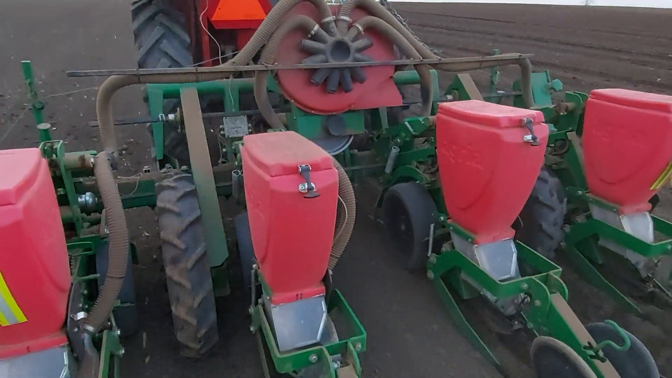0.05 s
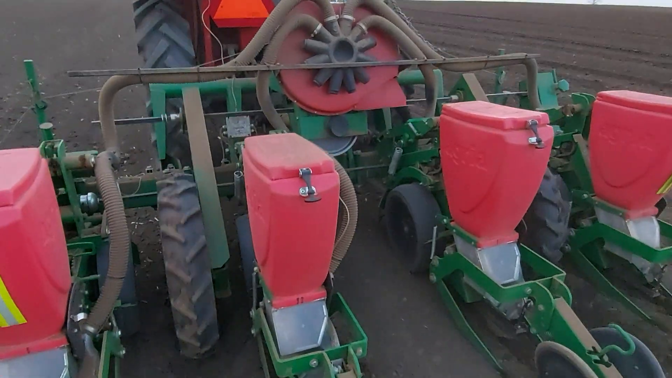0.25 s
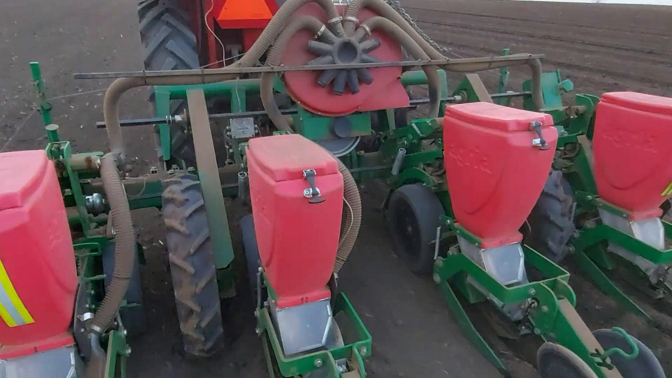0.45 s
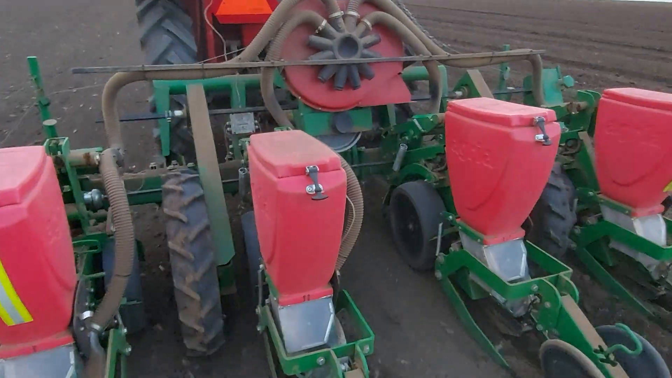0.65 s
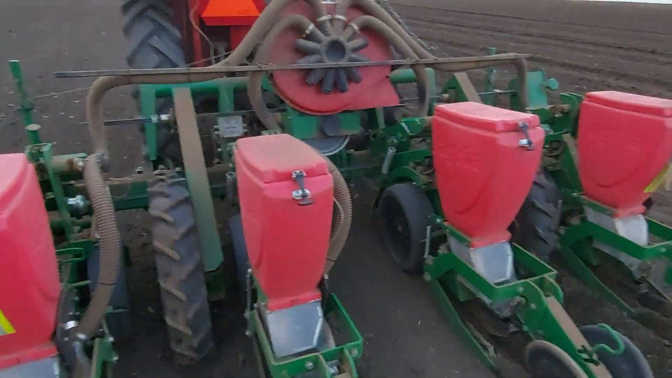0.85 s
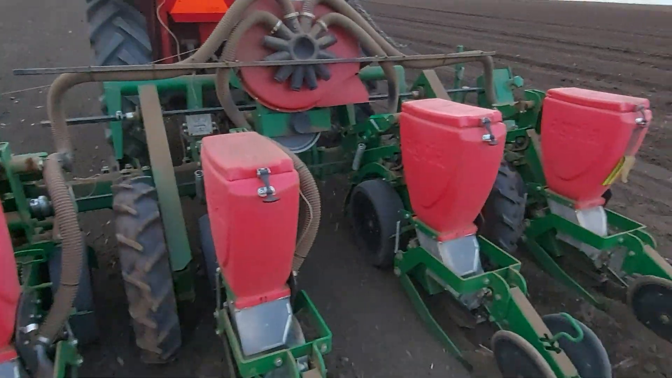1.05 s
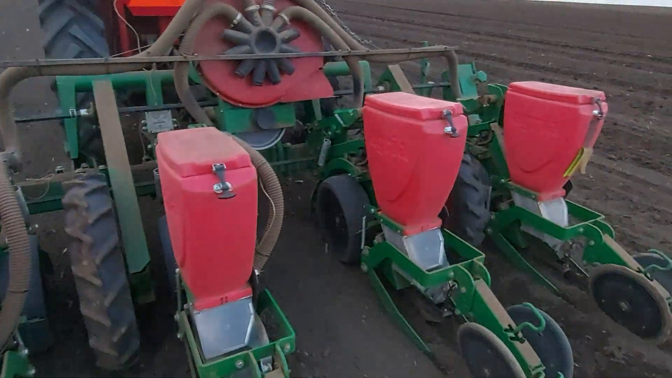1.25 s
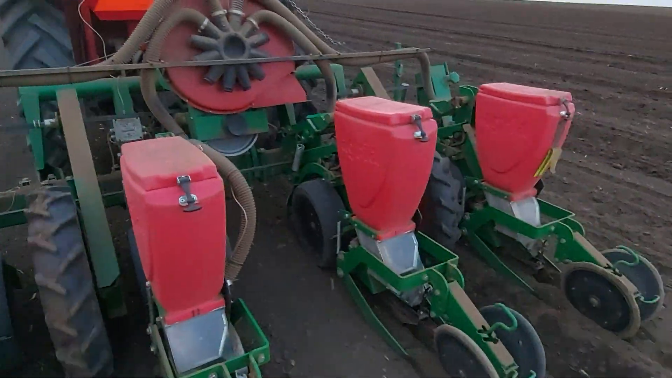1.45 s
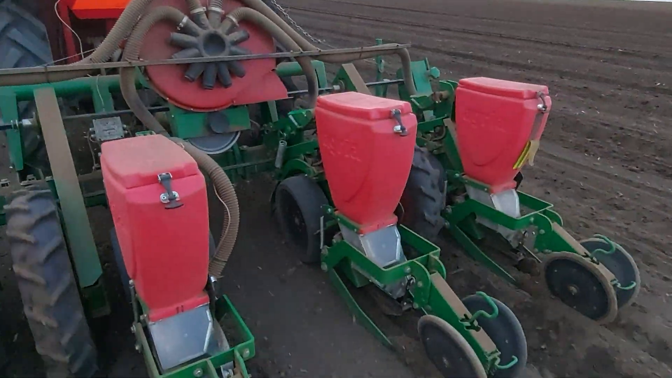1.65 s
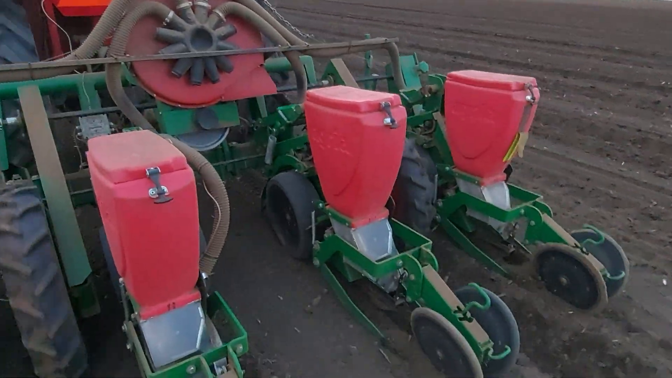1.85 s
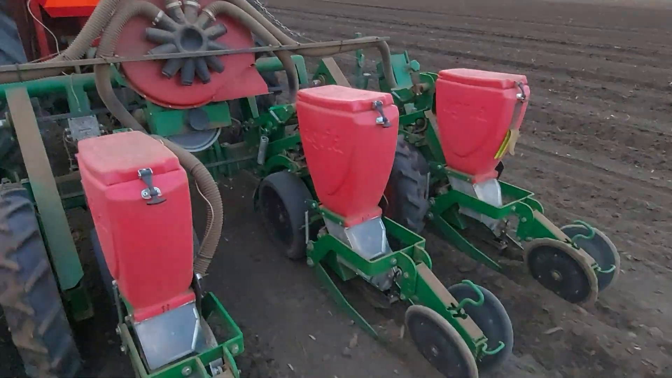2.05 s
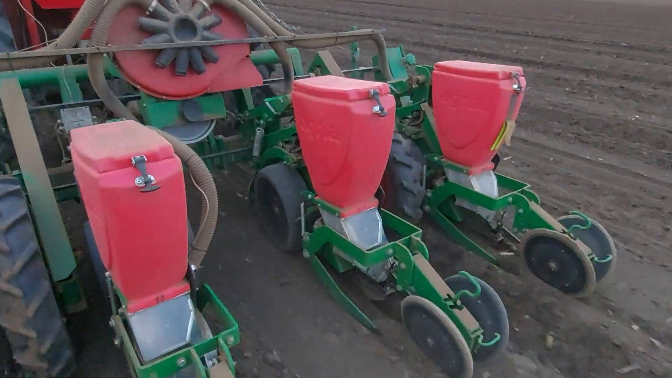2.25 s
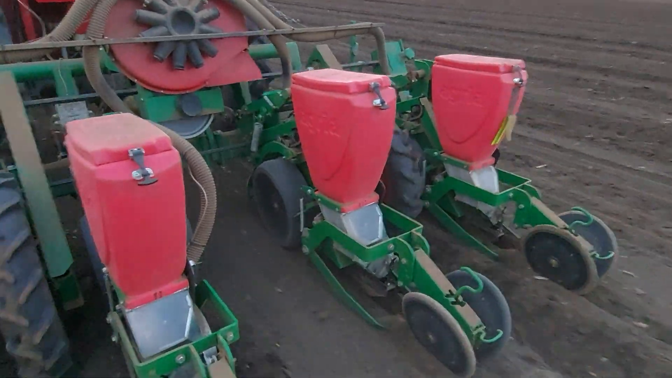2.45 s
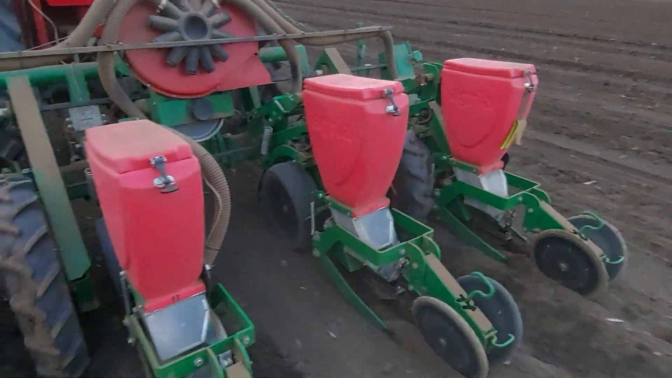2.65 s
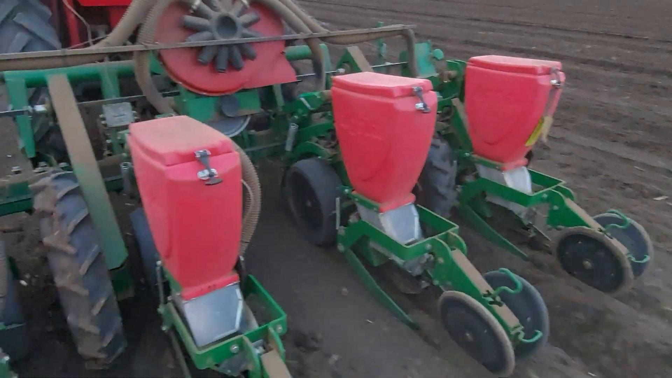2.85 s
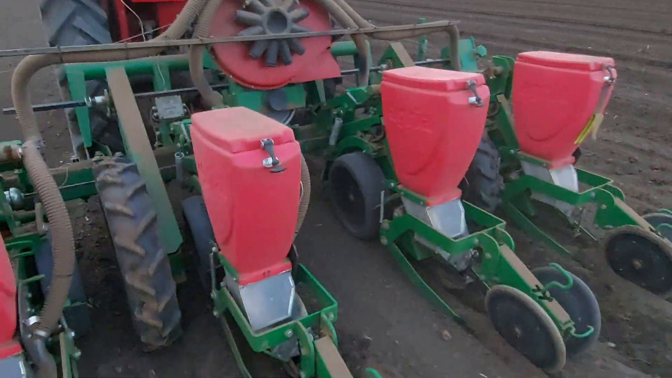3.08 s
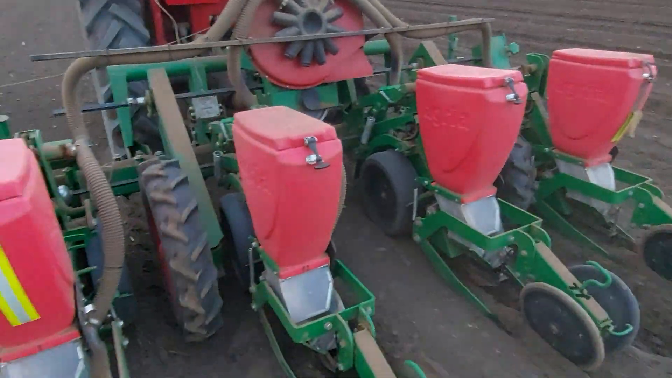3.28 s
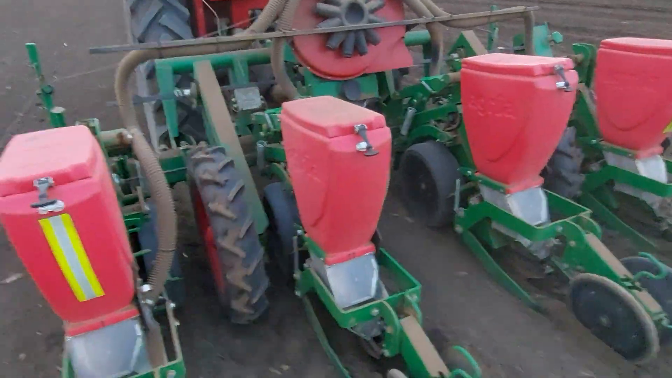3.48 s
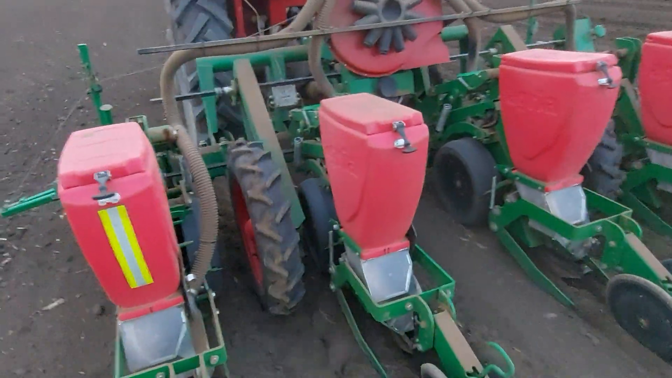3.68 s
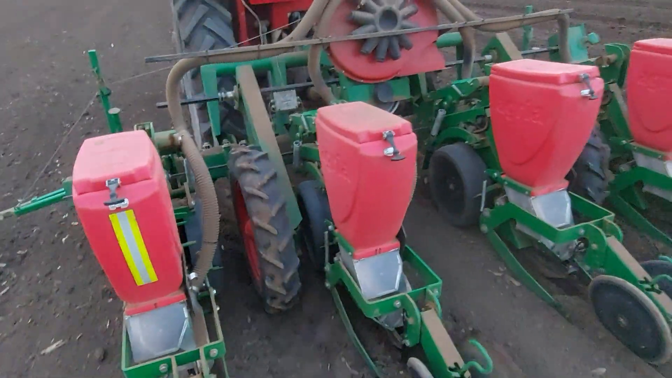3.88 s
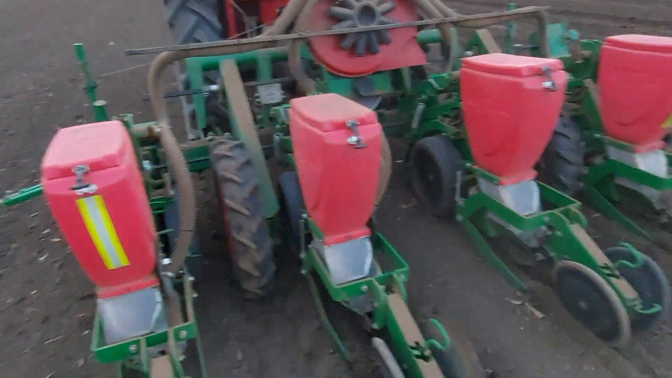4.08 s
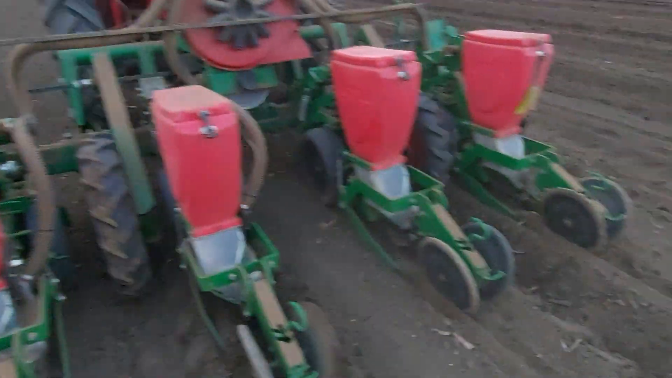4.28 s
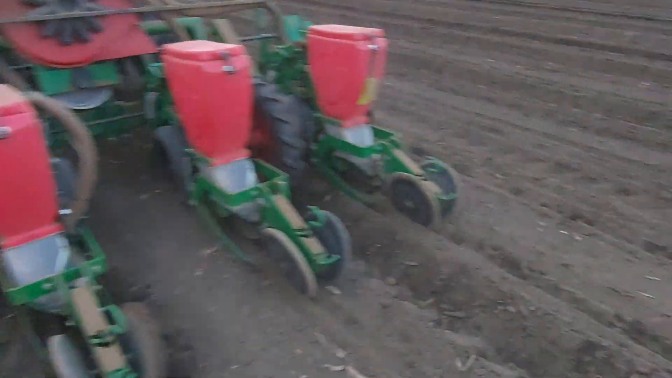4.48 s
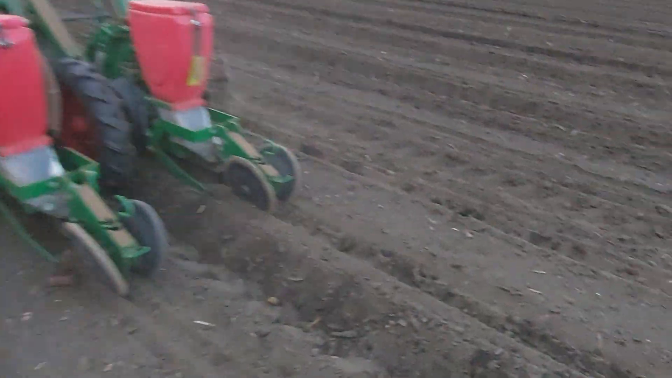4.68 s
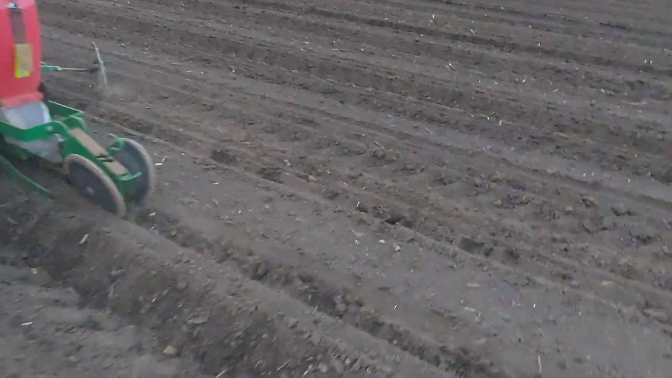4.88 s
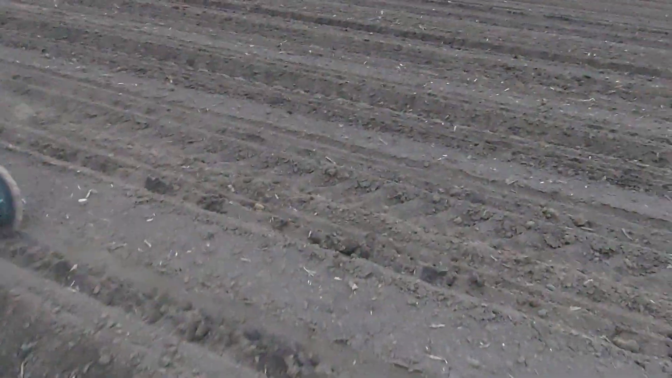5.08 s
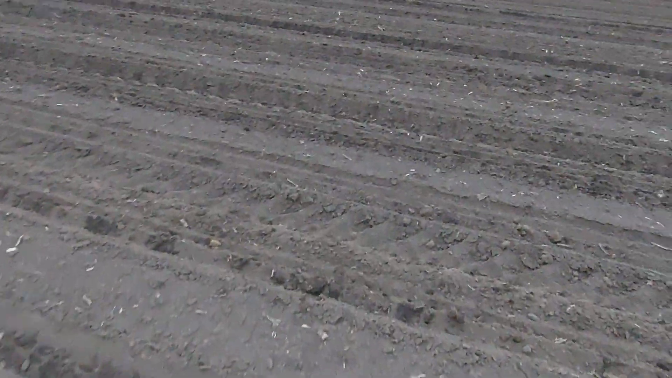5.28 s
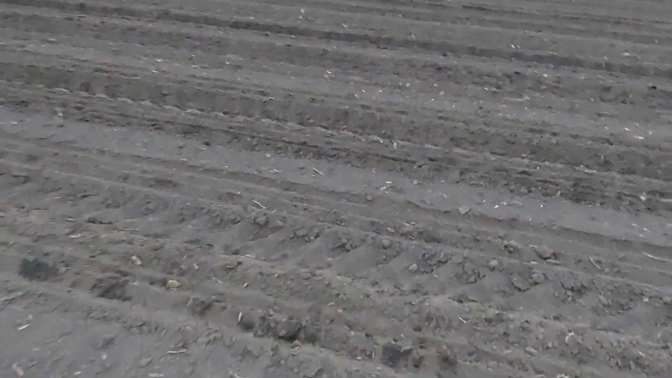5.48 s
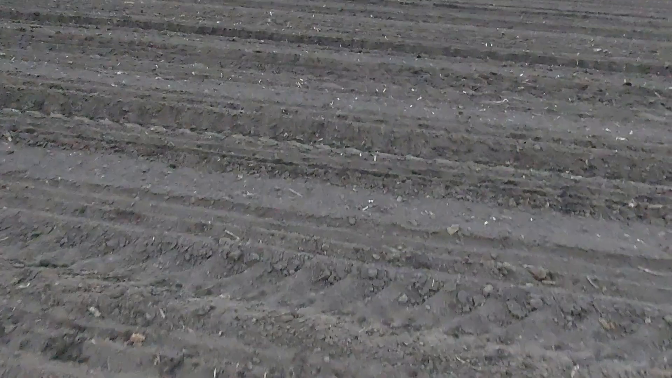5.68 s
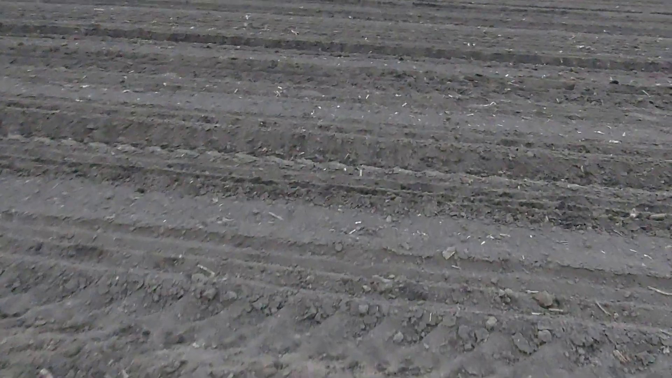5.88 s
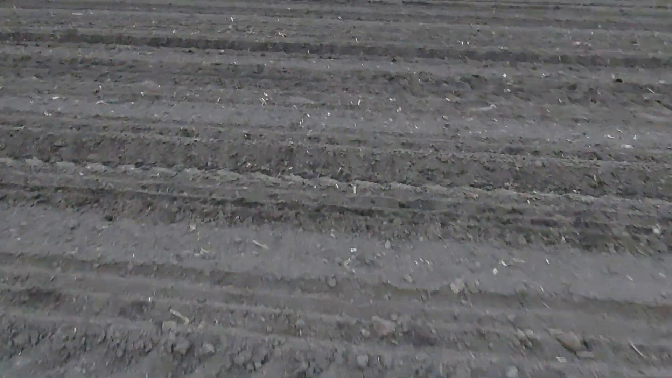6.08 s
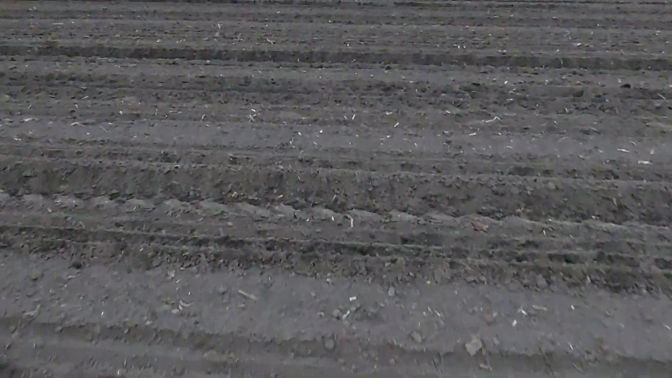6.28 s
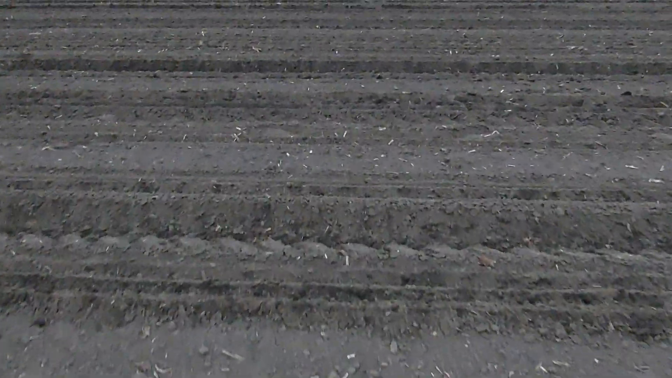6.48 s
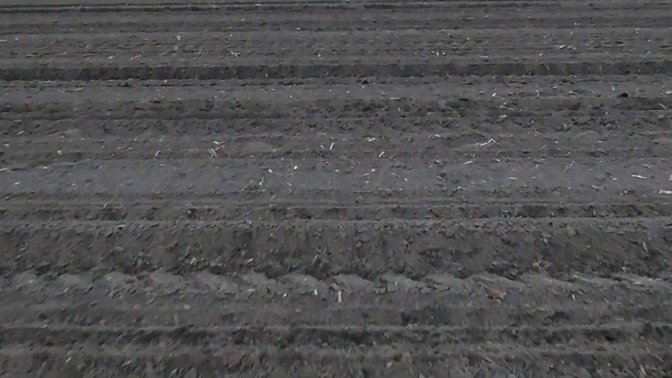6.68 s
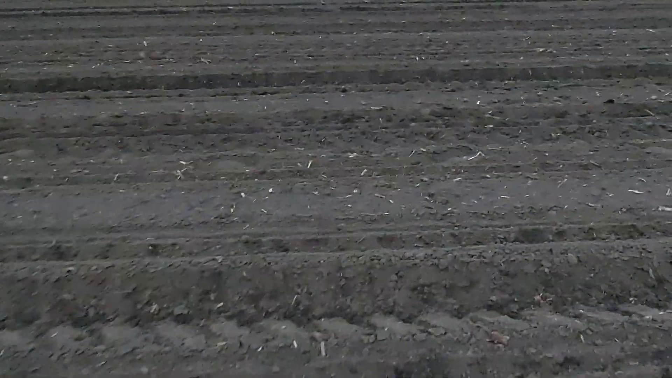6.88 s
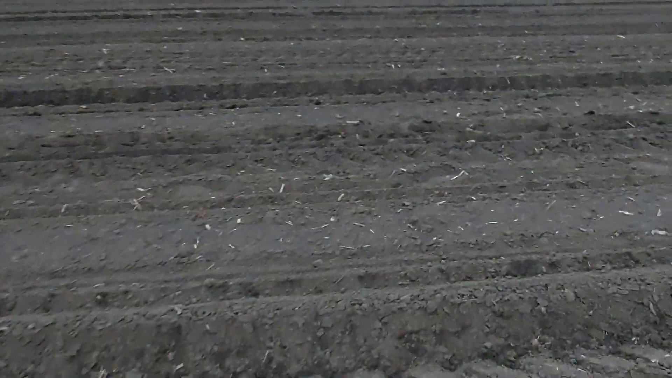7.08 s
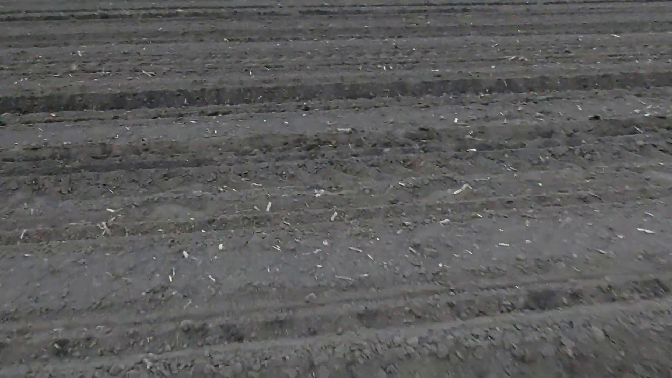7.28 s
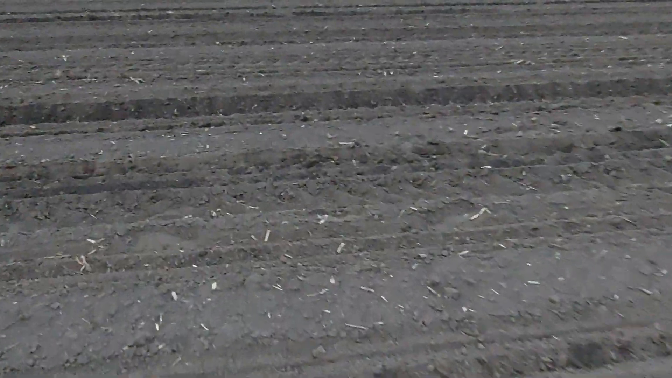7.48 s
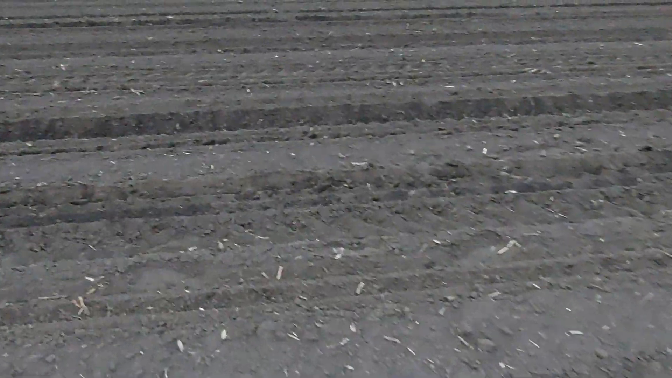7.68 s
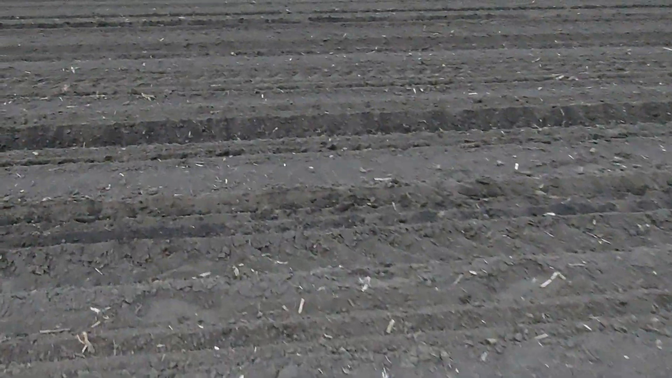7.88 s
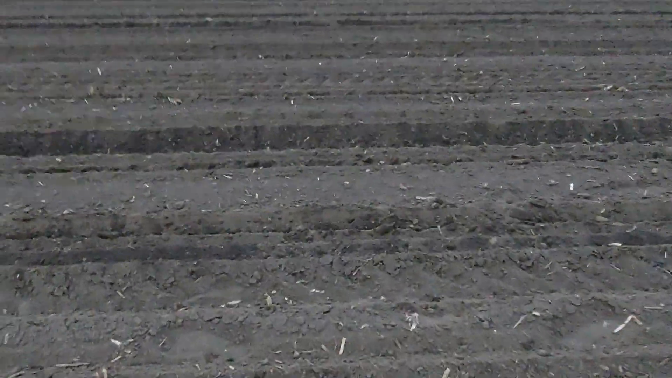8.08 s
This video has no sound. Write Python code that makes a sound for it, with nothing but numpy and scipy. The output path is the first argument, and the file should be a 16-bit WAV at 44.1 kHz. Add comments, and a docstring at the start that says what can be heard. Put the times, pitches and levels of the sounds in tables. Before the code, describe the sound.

A tractor at constant speed pulls a pneumatic planter. Its fan holds one buzzing, siren-like pitch, with rushing air, sizzling leaks, thin gear tones and a lumpy diesel rumble beneath. A handheld stereo microphone follows near, catches a soft wind buffet, then turns toward bare soil, so the sound becomes quieter, duller and hollow without stopping.

```python
"""A fan whines at its blade rate over a roar of air and a hiss of suction, while an engine throbs below.
The four-cylinder tractor draws a pneumatic planter over a field; its shaft spins the planter's vacuum fan.
Whine, engine and gears are sums of sines locked to one shaft speed; the air sounds are filtered noise.
Two spaced microphone ports follow close behind, then turn aside: the fan grows quieter and duller."""
import sys
import numpy as np
from scipy import signal
from scipy.fft import rfft, irfft, next_fast_len
from scipy.io import wavfile
from scipy.ndimage import uniform_filter1d

SR = 44100
rng = np.random.default_rng(int(sys.argv[2]) if len(sys.argv) > 2 else 0)


def dump(signal):
    """Clip the signal to [-1, 1] and save it as 16-bit WAV at the path in sys.argv[1]."""
    limited = np.clip(np.atleast_2d(signal).T, -1, 1)
    pcm = np.round(limited * 32767).astype(np.int16)
    wavfile.write(sys.argv[1], SR, pcm)


N = 358974

TIME = np.arange(N) / SR
FINE_TIME = np.arange(4 * N) / (4 * SR)
SIZE = next_fast_len(N, True)
HZ = np.maximum(np.arange(SIZE // 2 + 1) * SR / SIZE, 1)

# Mean blade passing rate, sagging a little as the load grows: (time [s], rate [Hz])
BLADE_RATE = [(0, 624.4), (3, 624.1), (4.4, 623.2), (5, 621.5), (5.5, 618), (6.2, 619.2), (6.6, 617.6),
              (8.14, 617.8)]
BLADES_PER_REV = 18
BELT_LAPS_PER_S = 14.4   # at the opening blade rate; follows the shaft speed
# Blade tone before panning: (time [s], level [dB])
WHINE_LEVEL = [(0, -11.5), (1.1, -12), (2.9, -13.7), (3.4, -13), (4.75, -13), (4.92, -18), (6.2, -22),
               (7.2, -18.5), (8.14, -20.5)]
# Bearing of the machine, as the lag of the left port behind the right: (time [s], lag [ms])
BEARING = [(0, 0.05), (.6, 0.064), (1.5, -0.12), (2.4, -0.15), (3, 0.007), (3.9, 0.15), (4.2, 0.024),
           (4.6, -0.29), (5.1, -.49), (6.5, -0.49), (7.25, -0.39), (8.14, -0.48)]
# Swell and fade of the air noises with the walker's distance: (time [s], level [dB])
NEARNESS = [(0, -0.35), (2.2, 1.7), (4, -0.5), (4.9, 0.95), (5.6, -1.1), (6.5, 1), (7.5, -0.25),
            (8.14, -0.8)]

# Relative spectrum of fan casing and hoses: (frequency [Hz], facing [dB], turned aside [dB])
ROAR_COLOUR = [(224, -16, -14), (299, -5.5, -3.5), (375, -10, -9), (432, 0.5, -0.5), (483, -4, -5.5),
               (565, 3, 2.5), (728, -9, -1), (704, -11, 0.5), (842, -6, -2), (890, -1.5, -8.5),
               (927, -10, -10), (1085, -1.5, -10), (1217, -6.5, -8), (1300, -11, -10.5)]
# Relative spectra of hoses and of their leaks:
# (frequency [Hz], facing left [dB], facing right [dB], aside left [dB], aside right [dB])
HISS_COLOUR = [(1484, 7.5, 4.5, -3, -10), (1650, 1.5, 2, -2, -3), (1910, 4, -6, -1, -0.5),
               (2120, 6, 4.5, 2, 2), (2380, 2, 0, 0, 3), (2900.0, 1.5, -2, -5, 0),
               (3500.0, 1, -3.5, 2.5, 4), (4300, 0.5, 0, -5.5, 4), (4820, 2, -0.5, 0.5, -14),
               (5600, -1.5, 4.5, -6, -1), (6170, 1.5, 2, -1, -2.5), (7200, -2.5, -2.5, -4, -6),
               (8150, -9, 0.5, -15, -1.5), (9190, -13, -5, -12, -10)]
SIZZLE_COLOUR = [(9500, 1.5, -14, -2, -28), (10300.0, 0, -1, -2, 3), (11400, -4.5, 8.5, 0, 1),
                 (12300.0, 1.5, 5, 1, -1), (14000.0, -0.5, 6.5, -2.5, 5), (15800, -8, 7.5, -4, -2)]
# Power share of air noise straight from the fan: (frequency [Hz], facing [0-1], turned aside [0-1])
DIRECT = [(200, 0.86, 1), (590, 0.99, 0.94), (1070, 0.94, 0.93), (1500, 0.4, 1), (2300, 0.52, 0.77),
          (4000, 0.05, 0.49), (7000, 0.07, 0.58), (15000, 0, 0)]
# Base levels of the air noises, first row facing, second in the shade: (left [dB], right [dB])
ROAR_LEVEL = [(-19.5, -20), (-25, -25)]
HISS_LEVEL = [(-27.5, -24.5), (-33.3, -25.5)]
SIZZLE_LEVEL = [(-33.5, -31), (-38, -47)]

# Even engine orders against the firing tone: (multiple of crank rate [1], facing [dB], aside [dB])
EVEN_ORDERS = [(2, 1.5, -0.5), (4, -35, -16), (6, -20, -21), (8, -16.5, -20)]
# Odd and half orders against the lope: (multiple of crank rate [1], facing [dB], aside [dB])
ODD_ORDERS = [(3, -0.5, 1.5), (3.5, -11, -20), (4.5, -13, -26), (5, -1.5, -7.5), (7, -20, -20),
              (9, -21, -22.5)]
# Relative spectrum of the exhaust rumble: (frequency [Hz], level [dB])
RUMBLE_COLOUR = [(20, -31), (35, -21), (50, -15), (65, -1), (88, -9), (125, 0.5), (165, -2.5), (195, -10.5),
                 (230, -10)]
# Engine parts before the scene's common gain: (facing [dB], in the shade [dB])
FIRING_DB, LOPE_DB, RUMBLE_DB = (-27.5, -24.5), (-31.5, -32), (-34.5, -37)
# Gears and bearings before separate lifts for facing and aside:
# (multiple of crank rate [1], facing [dB], aside [dB])
GEARS = [(11.33, -38, -41), (15.58, -35, -40), (22.44, -37, -41), (25.04, -41, -57), (28.02, -42, -49),
         (39.25, -50, -51), (43.98, -56, -52), (44.85, -57, -53), (45.73, -60, -53), (49.1, -52, -63),
         (52.77, -49, -59), (53.98, -53, -53), (56.1, -53, -59), (61.69, -46, -51), (63.33, -55, -51),
         (67.27, -54, -50), (72.12, -50, -52), (72.85, -55, -50), (75.17, -59, -54), (89.73, -55, -52),
         (106.54, -63, -52), (107.33, -56, -53), (117.92, -52, -51), (121.31, -59, -50), (135.75, -54, -62),
         (151.31, -52, -55)]

# Narrow beams that the ports pass through: (centre [s], half width [s], peak [dB])
HOWL_BEAM = (2.3, 0.63, -31)   # the fan's casing
BOOM_BEAM = (5.12, 0.39, -30)   # the gap between the hoppers
LEAK_BEAM = (4.58, 0.18, 3.3)   # a leak's lift of the hiss at the right port
# Puff of wind: (centre [s], half width [s], peak [dB])
PUFF = (2.93, 0.1, -24)
# Relative spectrum of the puff: (frequency [Hz], level [dB])
PUFF_COLOUR = [(40, -3), (70, 0), (170, -4)]

# The ports swing aside quickly, then sink slowly into the shade of the body that carries them
TURN_S, TURN_LENGTH_S = 4.5, 0.65   # middle and duration
SHADE_S, SHADE_SETTLE_S = 4.75, 0.99   # onset and time constant
# The turn opens an inverted second path to the right port; its detour shortens and it fades
DETOUR_START_MS, DETOUR_END_MS, DETOUR_SETTLE_S = 2.08, 0.078, 1.84
DETOUR_STRENGTH, DETOUR_FADE_S = .72, 5.0
# Hiss also bends round that body to the right port
BEND_MS, BEND_PER_LAG = 0.284, 0.28   # delay at zero lag; added ms per ms of lag
BEND_STRENGTH, BEND_TURN_STRENGTH = 0.2, 0.25   # before the turn; added by it; shade removes both
CUTOFF_HZ = 15800


def from_db(db):
    """Level is logarithmic: decibels to amplitude gain."""
    return np.exp(np.asarray(db) * (np.log(10) / 20))


def rms_one(x):
    """Equal mean power: each channel is scaled to rms 1."""
    return x / np.sqrt(np.mean(x ** 2, axis=-1, keepdims=True) + 1e-20)


def in_time(rows):
    """Linear interpolation of a table's columns at every sample."""
    s, *columns = np.transpose(rows)
    return np.array([np.interp(TIME, s, c) for c in columns])


def in_hz(rows):
    """Interpolation of a table's columns along logarithmic frequency."""
    hz, *columns = np.transpose(rows)
    return np.array([np.interp(np.log(HZ), np.log(hz), c) for c in columns])


def colour(rows):
    """Spectral shaping: gains of unit power, with steep skirts beyond the table's ends."""
    low_skirt = 1 + (rows[0][0] / HZ) ** 24
    high_skirt = 1 + (HZ / rows[-1][0]) ** 40
    return rms_one(from_db(in_hz(rows)) / np.sqrt(low_skirt * high_skirt))


def white(channels):
    """Equal power at all frequencies: spectra of unrelated white noises."""
    return rfft(rng.standard_normal((channels, SIZE)))


def wave(spectrum):
    """Fourier synthesis: a spectrum becomes a signal."""
    return irfft(spectrum, SIZE)[..., :N]


def drift(rate):
    """Low-passed noise: random wander of rms 1, up to about `rate` Hz."""
    count = N // 32 + 2   # coarse grid, interpolated below
    hz = np.arange(count // 2 + 1) * SR / N
    spectrum = rfft(rng.standard_normal(count)) / (1 + (hz / rate) ** 2)
    slow = irfft(spectrum, count)
    return np.interp(TIME, np.linspace(0, N / SR, count), rms_one(slow))


def port_delays(lag_ms):
    """Time difference of arrival: half the lag late at the left port, half early at the right [s]."""
    return np.array([lag_ms, -lag_ms]) / 2000


def angle(hz):
    """Phase is the integral of frequency [rad]."""
    return 2 * np.pi * np.cumsum(hz) / SR


def blend(pair, share):
    """Linear transition from the facing value to the shaded one."""
    facing, shaded = np.array(pair)[..., None]
    return facing + (shaded - facing) * share


def settle(start_s, settle_s):
    """Exponential relaxation: 1 until the start, then dying away."""
    return np.exp(-np.maximum(TIME - start_s, 0) / settle_s)


def passing(beam):
    """Gaussian directivity: a bell from 0 to 1 and back as the ports cross a beam."""
    return np.exp(-.5 * ((TIME - beam[0]) / beam[1]) ** 2)


def whine(blade_hz, lag_ms, turned, flutter=0.092, flutter_rate=20, wobble=.05, belt_depth=0.076,
          lag_share=0.92, pan_db_per_ms=10, aside_pan_db=1.5, octave_db=-19.5, octave_aside_db=-23):
    """Blade-passing tone: blades chop the intake air; eddies and drive-belt laps modulate it."""
    level_db, = in_time(WHINE_LEVEL)
    # the balance follows the bearing until the ports turn
    pan_db = (pan_db_per_ms * lag_ms * (1 - turned) + aside_pan_db * turned) * [[.5], [-.5]]
    lag_phase = 2 * np.pi * blade_hz * port_delays(lag_share * lag_ms)
    phase = angle(blade_hz) + wobble * drift(13) - lag_phase

    belt_hz = BELT_LAPS_PER_S * blade_hz / blade_hz[0]
    belt = belt_depth * np.sin(angle(belt_hz) + .5 * drift(1))
    swell = 1 + belt + flutter * drift(flutter_rate)
    tone = from_db(level_db + pan_db) * swell * np.sin(phase)

    octave_level_db = level_db + 2 * pan_db + blend((octave_db, octave_aside_db), turned)
    octave = from_db(octave_level_db) * (1 + 0.28 * drift(11)) * np.sin(2 * phase)
    return np.sqrt(2) * (tone + octave)


def whirr(crank, repeating=0.11):
    """Cyclic noise: fourfold oversampled, with a power share repeating every two crank turns."""
    fresh = signal.resample_poly(rng.standard_normal(N), 4, 1)
    cycle = signal.resample_poly(rng.standard_normal(int(2 * SR / crank.mean())), 16, 1)
    place = np.interp(FINE_TIME, TIME, angle(crank) / (4 * np.pi)) % 1
    repeated = cycle[(place * len(cycle)).astype(int)]
    share = np.clip(repeating, 0, 1)
    return np.sqrt(1 - share) * fresh + np.sqrt(share) * repeated


def panel_echoes(source, shortest=0.00122, longest=.006, sway=.00007, count=4):
    """Comb filtering by reflections from hoppers and frame; path times [s] sway, shifting the ripples."""
    def echo(path):
        return np.interp(TIME - path - sway * drift(0.42), FINE_TIME, source)
    paths = rng.uniform(shortest, longest, (2, count))
    return rms_one(np.array([sum(echo(path) for path in port) for port in paths]))


def turbulence(crank, delay, turned, echo_share=0.31):
    """Partial coherence: a direct noise that lags between ports, mixed with a scattered one."""
    source = whirr(crank)
    echo_share = np.clip(echo_share, 0, 1)
    direct = rfft([np.interp(TIME - d, FINE_TIME, source) for d in delay], SIZE)
    echoes = rfft(panel_echoes(source), SIZE)
    scattered = np.sqrt(echo_share) * echoes + np.sqrt(1 - echo_share) * white(channels=2)
    facing, aside = [wave(np.sqrt(share) * direct + np.sqrt(1 - share) * scattered)
                     for share in np.clip(in_hz(DIRECT), 0, 1)]
    return rfft((1 - turned) * facing + turned * aside, SIZE)


def airflow(noise, spectrum, port_db, aside):
    """Directional radiation: the noise's colour slides from facing to shaded as the ports turn."""
    facing, shaded = wave(noise * colour(spectrum).reshape(2, -1, len(HZ)))
    aside = np.clip(aside, 0, 1)
    return from_db(port_db) * ((1 - aside) * facing + aside * shaded)


def hollow(ports, delay_ms, strength, size=1):
    """Two-path interference at the right port; averaging over size [samples] dulls the later path."""
    late = np.interp(TIME - delay_ms / 1000, TIME, uniform_filter1d(ports[1], size))
    right = (ports[1] + strength * late) / np.sqrt(1 + strength ** 2)
    return np.array([ports[0], right])


def fan(noise, blade_hz, lag_ms, turned, aside, near_db, surge_db=0.7):
    """Interference and resonance: whine and roar take two paths; casing and hopper gap ring."""
    detour_ms = DETOUR_END_MS + (DETOUR_START_MS - DETOUR_END_MS) * settle(TURN_S, DETOUR_SETTLE_S)
    strength = -DETOUR_STRENGTH * turned * settle(TURN_S, DETOUR_FADE_S)
    roar_db = blend(ROAR_LEVEL, aside) + near_db + surge_db * drift(10)
    roar = airflow(noise, ROAR_COLOUR, roar_db, aside)
    casing = howl(noise, HOWL_BEAM, centre_hz=1090, width_hz=59)
    hopper_gap = howl(noise, BOOM_BEAM, centre_hz=340, width_hz=45)
    two_paths = hollow(whine(blade_hz, lag_ms, turned) + roar, detour_ms, strength, size=32)
    return two_paths + casing + hopper_gap


def suction(noise, lag_ms, turned, shade, near_db, gust_db=.5, leak_left_share=0.53,
            sizzle_pan_db_per_ms=-18, sizzle_shade_power=1.4):
    """Turbulent flow noise: hiss of the hoses and finer sizzle of their leaks gust together."""
    swell_db = near_db + gust_db * drift(11)
    leak_db = LEAK_BEAM[2] * passing(LEAK_BEAM) * [[leak_left_share], [1]]
    hiss_db = blend(HISS_LEVEL, shade) + swell_db + leak_db
    hiss = airflow(noise, HISS_COLOUR, hiss_db, shade)

    pan_db = sizzle_pan_db_per_ms * lag_ms * (1 - turned) * [[.5], [-.5]]
    sizzle_db = blend(SIZZLE_LEVEL, shade ** sizzle_shade_power) + swell_db + pan_db
    sizzle = airflow(noise, SIZZLE_COLOUR, sizzle_db, shade)

    bend = (BEND_STRENGTH + BEND_TURN_STRENGTH * turned) * (1 - shade)
    return hollow(hiss, BEND_MS + BEND_PER_LAG * lag_ms, bend) + sizzle


def engine(crank, delay, aside, throb=0.26, apart_db=-9, uneven=0.17, shake=0.026):
    """Harmonic orders of two firings a turn; unequal cylinders add odd ones, exhaust puffs once a turn."""
    turn = angle(crank) + shake * drift(6.2) - 2 * np.pi * crank * delay
    firing = sum(from_db(blend(level, aside)) * np.cos(k * turn) for k, *level in EVEN_ORDERS)
    lope = sum(from_db(blend(level, aside)) * (1 + uneven * drift(4.3)) * np.cos(k * turn)
               for k, *level in ODD_ORDERS)
    mid, side = wave(white(channels=2) * colour(RUMBLE_COLOUR))
    exhaust = mid + from_db(apart_db) * side * [[1], [-1]]
    rumble = exhaust * (1 + throb * np.cos(turn[0]))
    parts = [(FIRING_DB, firing), (LOPE_DB, lope), (RUMBLE_DB, rumble)]
    return sum(from_db(blend(level, aside)) * part for level, part in parts)


def gears(crank, delay, aside, waver=0.4, smear=0.33, facing_lift_db=3.0, aside_lift_db=4.0):
    """Shaft-locked partials: gears and bearings give thin tones of wavering level and phase."""
    turn = angle(crank) - 2 * np.pi * crank * delay
    out = 0
    for k, facing_db, aside_db in GEARS:
        gain = from_db(blend((facing_db + facing_lift_db, aside_db + aside_lift_db), aside))
        out = out + gain * (1 + waver * drift(3.9)) * np.sin(k * turn + smear * drift(2.5))
    return out


def howl(noise, beam, centre_hz, width_hz):
    """Resonance: air noise in one narrow band, in quadrature to its source, heard inside its beam."""
    resonance = rms_one(1 / (1 + ((HZ - centre_hz) / width_hz) ** 2))
    return from_db(beam[2]) * passing(beam) * wave(1j * noise * resonance)


def wind():
    """Low-frequency pressure noise: one soft buffet on the right port."""
    buffet = wave(white(channels=1) * colour(PUFF_COLOUR))
    return from_db(PUFF[2]) * passing(PUFF) * buffet * [[0], [1]]


def scene(hunt_hz=0.2995, turn_share=0.37, tractor_near_share=0.33):
    """Superposition: one shaft speed drives engine, gears and fan; one turn of the ports shades them."""
    blade_hz = in_time(BLADE_RATE)[0] + hunt_hz * drift(2.024)
    crank = blade_hz / BLADES_PER_REV
    (lag_ms,), (near_db,) = in_time(BEARING), in_time(NEARNESS)
    turned = np.clip(.5 + (TIME - TURN_S) / TURN_LENGTH_S, 0, 1)
    shade = 1 - settle(SHADE_S, SHADE_SETTLE_S)
    aside = turn_share * turned + (1 - turn_share) * shade
    delay = port_delays(lag_ms)
    noise = turbulence(crank, delay, turned)

    planter = fan(noise, blade_hz, lag_ms, turned, aside, near_db)
    planter = planter + suction(noise, lag_ms, turned, shade, near_db)
    tractor = np.sqrt(2) * engine(crank, delay, shade) + gears(crank, delay, aside)
    tractor = from_db(tractor_near_share * near_db) * tractor
    return planter + tractor + wind()


def record(dry):
    """Elliptic low-pass filtering: the top is cut steeply."""
    low_pass = signal.ellip(12, .1, 90, CUTOFF_HZ, fs=SR, output="sos")
    return signal.sosfilt(low_pass, dry)


dry = scene()
out = record(dry)
dump(out)
```